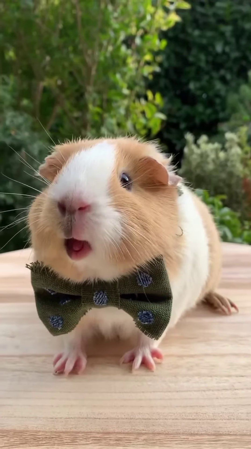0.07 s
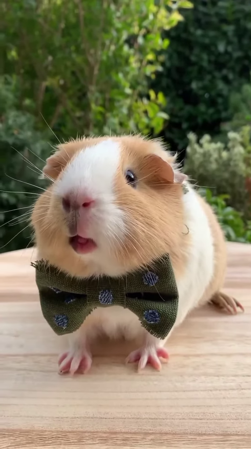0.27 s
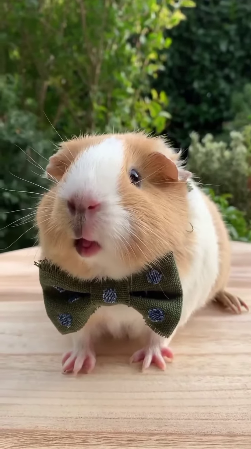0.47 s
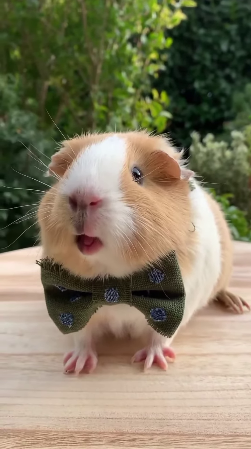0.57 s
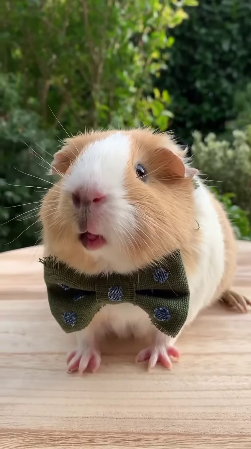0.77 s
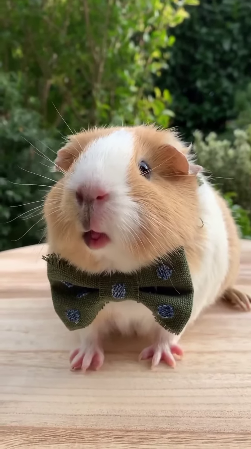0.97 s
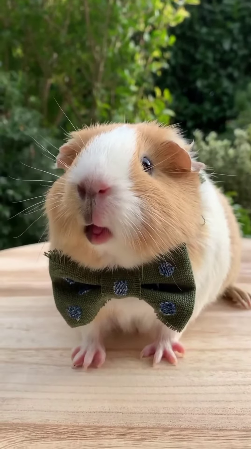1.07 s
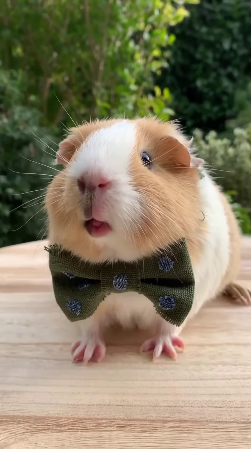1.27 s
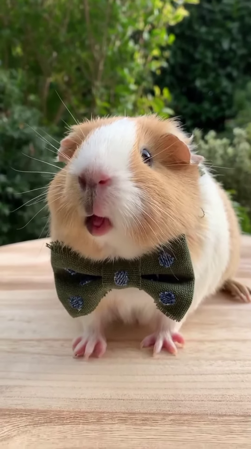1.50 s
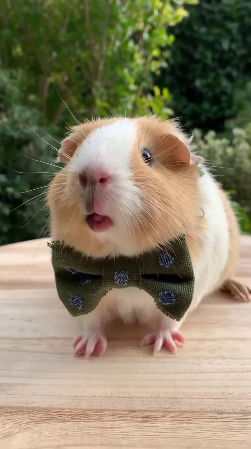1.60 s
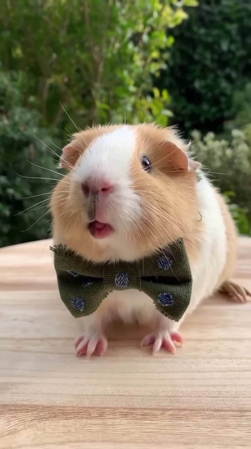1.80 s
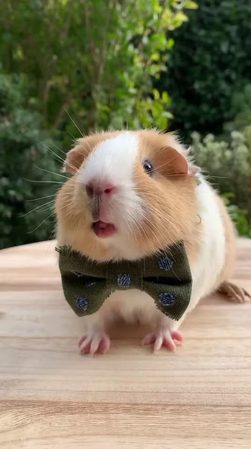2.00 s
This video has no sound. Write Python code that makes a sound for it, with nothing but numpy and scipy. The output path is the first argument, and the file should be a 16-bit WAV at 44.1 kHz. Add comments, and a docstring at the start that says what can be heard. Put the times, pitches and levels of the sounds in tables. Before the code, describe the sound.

A guinea pig wheeks five times, each squeak sweeping sharply upward, close to the microphone.

```python
"""In a room with a faint ring, a guinea pig wheeks five times close to a pair of microphone ports.
Each wheek sweeps up from a low reedy note through a hoarse, airy middle. The first four reach a loud
whistle; the fifth stops lower and softer. The voice is a stack of harmonics that at times doubles its
period; its breath is noise through throat resonances. Filtered noise makes a low rumble and a trace of
hiss, and a fading low sine makes one soft bump."""
import sys
import numpy as np
from scipy.fft import rfft, irfft
from scipy.io import wavfile
from scipy.ndimage import uniform_filter1d

SR = 44100
rng = np.random.default_rng(int(sys.argv[2]) if len(sys.argv) > 2 else 0)


def pcm_store(signal):
    """Save signal as 16-bit PCM."""
    levels = np.round(np.clip(np.atleast_2d(signal), -1, 1) * 32767)
    wavfile.write(sys.argv[1], SR, levels.astype(np.int16).T)


N = 90404
TIME = np.arange(N) / SR
FREQS = np.maximum(np.fft.rfftfreq(2 * N, 1 / SR), 1)

# Rumble spectrum, relative: f/Hz, level per Hz/dB
RUMBLE_SPECTRUM = [(25, -27.5), (42, -1), (66, 1), (100, -8), (250, -21), (500, -25.5), (1400, -22.5),
                   (2500, -41.5)]
# How alike the rumble is left and right: f/Hz, likeness (1 = the same)
RUMBLE_LIKENESS = [(60, 0.98), (300, 0.76), (2000, 0.042)]

# The path of each wheek: t/s, pitch f/Hz, fundamental level/dB, overtones level/dB,
# rush of air level/dB (before AIR_TRIM_DB)
WHEEK_1 = [(0.002, 775, -34, -33.5, -39.5), (0.014, 859, -38, -46.5, -50.5), (0.038, 1550, -25, -53, -33.5),
           (0.047, 1835, -36.0, -40, -52), (0.11, 2115, -23.5, -26.5, -56.5),
           (0.158, 2346, -26.5, -24, -74), (0.179, 2360, -21, -29, -47.5), (0.215, 2717, -25, -16.5, -51),
           (0.224, 2680, -26, -16, -51), (0.245, 2706, -26, -17.5, -44), (0.254, 3160, -32.5, -24, -36.5),
           (0.257, 3290, -31.5, -37, -45.5), (0.272, 3676, -26, -37, -44), (0.281, 3743, -28, -32.5, -48),
           (0.293, 3886, -18.5, -26, -55.5), (0.32, 3954, -22.5, -28.5, -56),
           (0.331, 3863, -16, -44, -34.5)]
WHEEK_2 = [(0.492, 822, -36, -40, -47.5), (0.502, 746, -41.5, -43.5, -43.5),
           (0.511, 783, -35.5, -35.0, -54.5), (0.538, 798.3, -39, -36, -45.5),
           (0.55, 921.4, -36.5, -55, -41), (0.569, 1547, -27.5, -43.5, -36),
           (0.581, 1963, -43.5, -34, -45.5), (0.625, 2345, -37.5, -58, -37), (0.649, 3216, -31, -37, -37.5),
           (0.668, 3198, -33.5, -37.5, -49.5), (0.696, 3571, -24.5, -41.5, -49.5),
           (0.737, 3938, -15, -27.0, -46), (0.769, 3876, -17, -31, -47.0), (0.778, 3850, -14.5, -44, -35.5)]
WHEEK_3 = [(0.946, 755, -38.5, -42.5, -47.5), (0.977, 726, -33, -34.5, -50), (1.0, 769, -37, -43.5, -48),
           (1.028, 1408, -28.5, -63, -42), (1.037, 1710, -41, -40, -43), (1.061, 1940, -50.5, -64.5, -39),
           (1.117, 3132, -29, -52, -52.5), (1.126, 3003, -34.5, -47.5, -43),
           (1.144, 3398, -29.5, -51.5, -56), (1.199, 3814, -17, -35, -61.5), (1.232, 3840, -14.5, -32, -51),
           (1.249, 3822, -19, -49.5, -42.5)]
WHEEK_4 = [(1.418, 748.4, -39, -36, -54), (1.442, 717.6, -32.5, -32, -59.5),
           (1.469, 786.8, -35.5, -37, -53), (1.481, 957.5, -34.5, -79, -44), (1.5, 1419, -27, -45.5, -49.5),
           (1.524, 1938, -58.5, -53.5, -42.5), (1.547, 2023, -51.5, -63, -41.5),
           (1.559, 2338, -47, -57, -42), (1.59, 3082, -32.5, -44.5, -41), (1.667, 3910, -23.5, -36, -50.5),
           (1.688, 3794, -18.5, -33.0, -58), (1.702, 3752, -23, -45, -48.5)]
WHEEK_5 = [(1.868, 754.6, -40.5, -40.5, -55), (1.895, 720.4, -33, -35.5, -64),
           (1.925, 806.3, -39, -40.5, -55.5), (1.93, 889, -39.5, -85, -47.0),
           (1.951, 1437, -30.0, -66, -45), (1.963, 2010, -63.5, -81, -46), (2.006, 2307, -40.5, -78, -41.5),
           (2.012, 2658, -43, -58, -51), (2.046, 2925, -25.5, -71, -44.5)]
# Moments when the voice turns rough: middle t/s, length t/s, roughness (0-1)
STRAINS = [(.1, .07, .08), (.175, .06, .22), (.25, .016, .35)]
# Moments of period doubling: middle t/s, length t/s, level against the fundamental/dB
# (HALF_LINE_LEVELS is added to it)
DOUBLINGS = [(0.305, 0.02, -1.5), (0.501, 0.015, 14), (0.546, 0.024, 7), (0.599, 0.049, 6),
             (0.756, 0.024, -8), (1.205, 0.031, -17), (1.661, 0.049, -0.5), (1.878, 0.031, 7),
             (1.935, 0.013, 14), (1.985, 0.058, 19.5)]
# Extra lines at 1/2 and 3/2 of the pitch: level/dB
HALF_LINE_LEVELS = [-24, -13.5]
# The larynx, one row each for harmonics 2 to 7, relative: low-note level/dB, whistle level/dB
LARYNX_HARMONICS = [(5, 0.5), (-24, -10), (-11, -2), (-22, -7), (-24, -11.5), (-27.5, -22)]
# How the throat colours the overtones, relative: f/Hz, level/dB
THROAT_COLOUR = [(3900, 11.5), (4600, -19.5), (5400, 12), (6800, -4), (7900, 5.5), (9200, 10),
                 (10000, -0.5), (11700, -2), (12600, -1.5), (13400, -26.5)]
# Throat resonances that the air excites: open f/Hz, narrowed f/Hz, width f/Hz,
# open level/dB, narrowed level/dB (levels relative to each other)
AIR_RESONANCES = [(1639, 1100, 1800, -6, -1), (3460, 5500, 1400, -2.5, 7.5), (6770, 9400, 1500, -15, 7),
                  (12380, 12350, 1200, -17.5, -0.5)]

# Phase between the two ports: f/Hz, left lead/radians
PORT_PHASE = [(750, 0.46), (950, -0.45), (1600, -1.4), (2650, -2.5), (3500, -4.5), (4000, -4),
              (5400, -2.25), (7200, .5), (8700, 3), (11700, 6.5), (12700, 10)]
# Loudness between the two ports: f/Hz, left minus right level/dB
PORT_BALANCE = [(400, 3), (740, 5.5), (1100, -1), (1600, 0.5), (2500, -3), (3800, -0.13)]
# Colour of the room's ring: f/Hz, level/dB (added to ROOM_DB)
ROOM_COLOUR = [(2000, 4.5), (3900, -10), (5500, -12.5), (13000, -9)]

RUMBLE_DB, HISS_DB = -49, -78.5  # average (rms) levels
BUMP_S, BUMP_FADE_S, BUMP_HZ, BUMP_DB = 1.955, 0.054, 62.2, -35.5
ATTACK_S, VOICE_RELEASE_S, AIR_RELEASE_S = 0.0062, 0.0025, 0.0086
# Pitch wobble as a fraction of the pitch, and loudness wobble, in a clean and a hoarse voice
JITTER_CLEAN, JITTER_HOARSE, JITTER_HZ = .001, .022, 300
SHIMMER_CLEAN_DB, SHIMMER_HOARSE_DB, SHIMMER_HZ = .15, 2.5, 150
OVERTONE_RASP, RASP_HZ = .4, 380
LOW_NOTE_UP_TO_HZ, WHISTLE_BLEND_HZ = 1570, 250
OVERTONE_WEIGHT_DB = -6.5  # strong overtones also keep the voice steady
# A loud voice narrows the throat as a higher pitch does
NARROWING_HZ_PER_DB, EASY_VOICE_DB = 34.5, -39
NARROWING_FROM_HZ, NARROWING_SPAN_HZ = 2350, 761
AIR_TRIM_DB = -1.0
ROOM_T60_S, ROOM_DB = 0.2, -16.5  # time for the ring to fall by 60 dB, and its level
CUTOFF_HZ = 13300


def from_db(db):
    """Turn decibels into a gain to multiply by."""
    return 10 ** (np.asarray(db) / 20)


def rms_one(x):
    """Scale a signal so its average (rms) strength is 1."""
    return x / np.sqrt(np.mean(x ** 2) + 1e-20)


def at_hz(points, hz):
    """Read between the points of a spectrum, with frequency on a log scale."""
    point_hz, value = np.transpose(points)
    return np.interp(np.log(hz), np.log(point_hz), value)


def filtered(x, response):
    """Make each frequency louder, softer or shifted in phase, as the response says."""
    spectrum = rfft(x, 2 * N)
    return irfft(spectrum * response)[..., :N]


def wobble(hz):
    """Random movement up to about this rate, with spread 1."""
    low_pass = 1 / (1 + (FREQS / hz) ** 4)
    return rms_one(filtered(rng.standard_normal(N), low_pass))


def above(pitch, hz, span_hz):
    """Go smoothly from 0 to 1 as the pitch passes hz."""
    return .5 + .5 * np.tanh((pitch - hz) / span_hz)


def shares(levels_db):
    """Gains in these proportions whose powers add up to one."""
    gains = from_db(levels_db)
    return gains / np.sqrt(np.sum(gains ** 2, axis=0))


def swell(middle_s, length_s):
    """Rise and fall around a moment, shaped like half a cosine wave."""
    return np.cos(np.pi * np.clip((TIME - middle_s) / length_s, -.5, .5))


def gate(start_s, end_s, release_s):
    """Open quickly, hold, then fade exponentially."""
    attack = np.clip((TIME - start_s) / ATTACK_S + .5, 0, 1)
    release = np.exp(-np.maximum(TIME - end_s, 0) / release_s)
    return attack * release


def rumble():
    """Low coloured noise; sharing a middle part makes left and right partly alike."""
    alike = np.clip(at_hz(RUMBLE_LIKENESS, FREQS), -1, 1)
    top_cut = 1 / (1 + (FREQS / 2800) ** 8)
    colour = from_db(at_hz(RUMBLE_SPECTRUM, FREQS)) * top_cut
    mid_and_side = np.sqrt([1 + alike, 1 - alike])
    mid, side = filtered(rng.standard_normal((2, N)), colour * mid_and_side)
    return from_db(RUMBLE_DB) * rms_one(np.array([mid + side, mid - side]))


def hiss():
    """Equal noise at all frequencies, separate on each side."""
    return from_db(HISS_DB) * rng.standard_normal((2, N))


def soft_bump():
    """A low sine that starts at its moment and dies away, the same on both sides."""
    age = np.maximum(TIME - BUMP_S, 0)
    # the minus sign makes it push downward first
    return -from_db(BUMP_DB) * np.sin(2 * np.pi * BUMP_HZ * age) * np.exp(-age / BUMP_FADE_S)


def background():
    """Rumble, hiss and bump simply add together."""
    return rumble() + hiss() + soft_bump()


def guinea_pig():
    """Five wheeks; the voice is hoarse when air outweighs tone, and at moments of strain."""
    controls, voice_gate, air_gate = np.zeros((4, N)), 0, 0
    for rows in [WHEEK_1, WHEEK_2, WHEEK_3, WHEEK_4, WHEEK_5]:
        s, *columns = np.transpose(rows)
        path = [np.interp(TIME, s, column) for column in columns]
        controls = np.where(TIME > s[0] - ATTACK_S, path, controls)
        voice_gate = voice_gate + gate(s[0], s[-1], VOICE_RELEASE_S)
        air_gate = air_gate + gate(s[0], s[-1], AIR_RELEASE_S)
    pitch, fundamental_db, overtones_db, air_db = controls
    pitch = np.maximum(uniform_filter1d(pitch, size=130), 1)  # smooth the corners

    steady_db = np.maximum(fundamental_db, overtones_db + OVERTONE_WEIGHT_DB)
    hoarse = np.minimum(from_db(air_db - steady_db), 1)
    strain = sum(rough * swell(s, length) for s, length, rough in STRAINS)
    hoarse = np.maximum(hoarse, strain)

    tone = voice(pitch, hoarse, overtones_db, fundamental_db)
    breath = air(pitch, fundamental_db, air_db)
    return voice_gate * tone + air_gate * breath


def voice(pitch, hoarse, overtones_db, fundamental_db):
    """Larynx harmonics shaped by the throat, with in-between lines where the period doubles."""
    jitter = (JITTER_CLEAN + JITTER_HOARSE * hoarse) * wobble(JITTER_HZ)
    phase = 2 * np.pi * np.cumsum(pitch * (1 + jitter)) / SR
    whistle = above(pitch, LOW_NOTE_UP_TO_HZ, WHISTLE_BLEND_HZ)

    harmonic_levels = []
    for k, (low_db, high_db) in enumerate(LARYNX_HARMONICS, 2):
        larynx_db = (1 - whistle) * low_db + whistle * high_db
        harmonic_levels.append(at_hz(THROAT_COLOUR, k * pitch) + larynx_db)
    overtones = from_db(overtones_db) * shares(harmonic_levels)

    out = 0
    for k, gain in enumerate([from_db(fundamental_db), *overtones], 1):
        # each overtone flutters on its own, the higher the more
        rasp = OVERTONE_RASP * hoarse * (k - 1) * (1 + whistle)
        flutter = 1 + rasp * (wobble(RASP_HZ) + 1j * wobble(RASP_HZ)) / np.sqrt(2)
        tone = np.real(flutter * np.exp(1j * k * phase)) / np.sqrt(1 + rasp ** 2)
        can_be_played = k * pitch < SR / 2
        out += gain * can_be_played * tone

    doubling = sum(from_db(db) * swell(s, length) for s, length, db in DOUBLINGS)
    for k, db in enumerate(HALF_LINE_LEVELS):
        out += doubling * from_db(fundamental_db + db) * np.sin((k + .5) * phase)

    shimmer_db = (SHIMMER_CLEAN_DB + SHIMMER_HOARSE_DB * hoarse) * wobble(SHIMMER_HZ)
    return np.sqrt(2) * out * from_db(shimmer_db)  # root 2 turns peak levels into rms levels


def air(pitch, fundamental_db, air_db):
    """Air rushes through the throat, whose resonances move and change weight as it narrows."""
    effort_hz = NARROWING_HZ_PER_DB * (fundamental_db - EASY_VOICE_DB)
    narrow = above(pitch + effort_hz, NARROWING_FROM_HZ, NARROWING_SPAN_HZ)
    gains = shares([open_db + narrow * (narrow_db - open_db)
                    for *_, open_db, narrow_db in AIR_RESONANCES])
    rush = 0
    for gain, (open_hz, narrow_hz, width_hz, *_) in zip(gains, AIR_RESONANCES):
        centre_hz = open_hz + narrow * (narrow_hz - open_hz)
        rush = rush + gain * resonant_noise(centre_hz, width_hz)
    return from_db(air_db + AIR_TRIM_DB) * rush


def resonant_noise(hz, width_hz):
    """Noise kept to a steep-sided band whose centre can move."""
    slow_noise = wobble(width_hz / 2) + 1j * wobble(width_hz / 2)
    carrier = np.exp(2j * np.pi * np.cumsum(hz) / SR)
    return np.real(slow_noise * carrier)


def ports(x):
    """The two ports hear the animal with different phase and level."""
    # half of the difference goes to the left, the opposite half to the right
    half_level = from_db(at_hz(PORT_BALANCE, FREQS) / 2)
    half = half_level * np.exp(.5j * at_hz(PORT_PHASE, FREQS))
    return filtered(x, np.array([half, 1 / half]))


def room(x):
    """Many blurred reflections, built from fading noise that differs on each side."""
    tail = rng.standard_normal((2, N)) * from_db(-60 * TIME / ROOM_T60_S)
    tail /= np.sqrt(np.sum(tail ** 2) / 2)
    colour = from_db(ROOM_DB + at_hz(ROOM_COLOUR, FREQS))
    return filtered(x, rfft(tail, 2 * N) * colour)


def scene():
    """The background, the animal at the two ports and the ring of its room add up."""
    calls = guinea_pig()
    return background() + ports(calls) + room(calls)


def record(dry):
    """Cut the highest frequencies off steeply."""
    return filtered(dry, 1 / np.sqrt(1 + (FREQS / CUTOFF_HZ) ** 160))


dry = scene()
out = record(dry)
pcm_store(out)
```